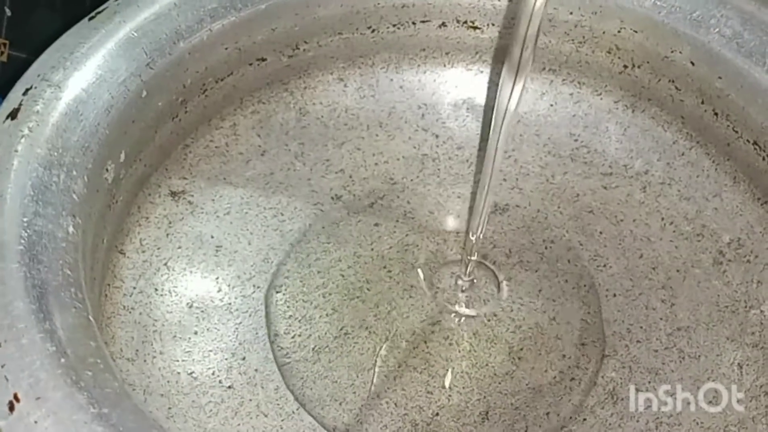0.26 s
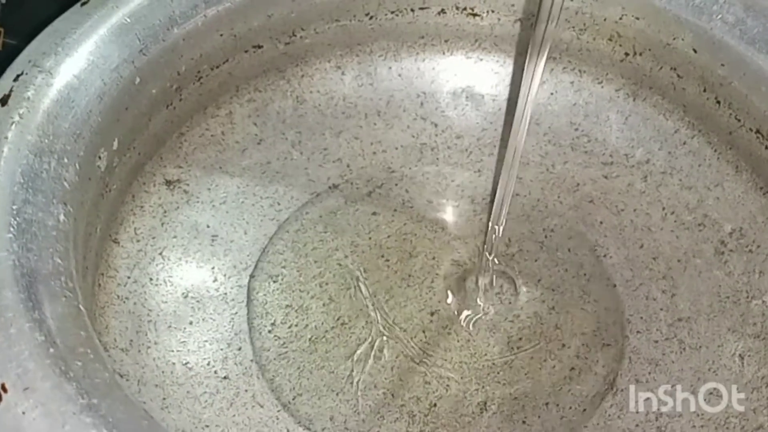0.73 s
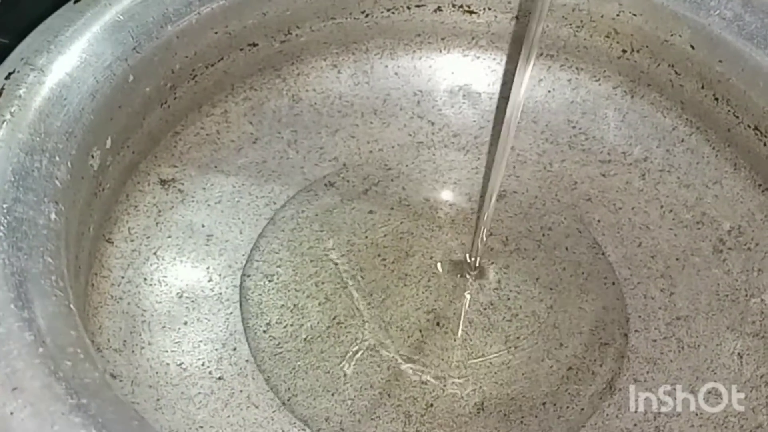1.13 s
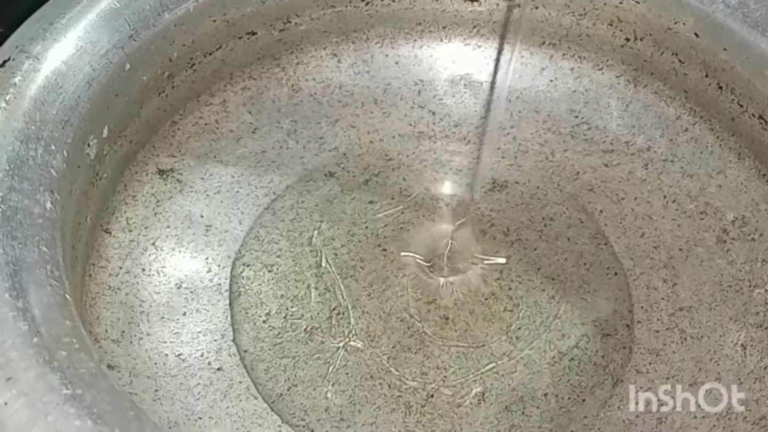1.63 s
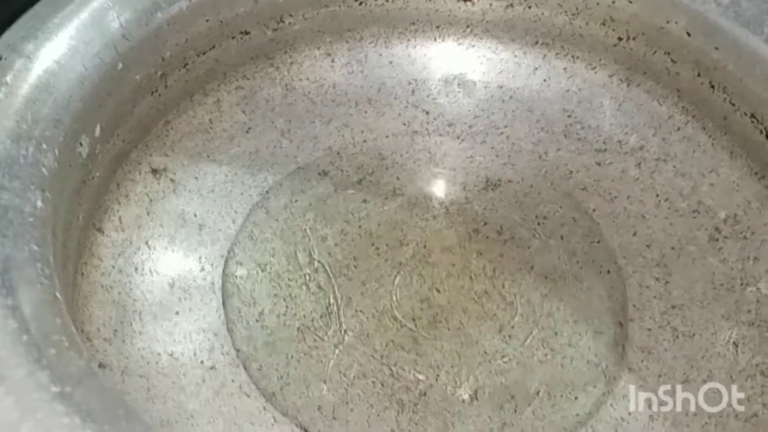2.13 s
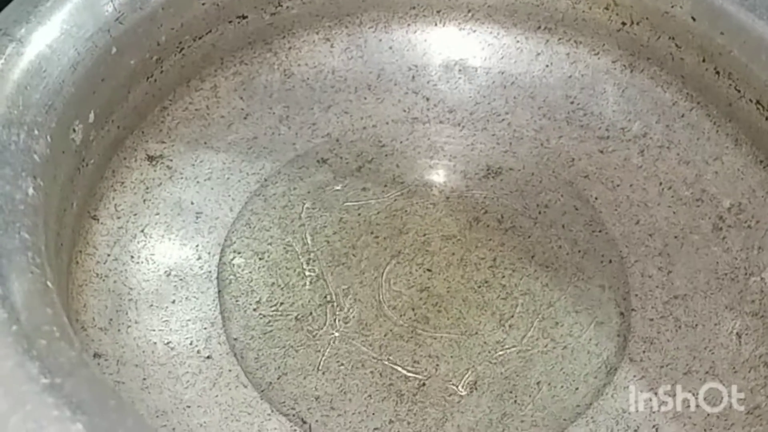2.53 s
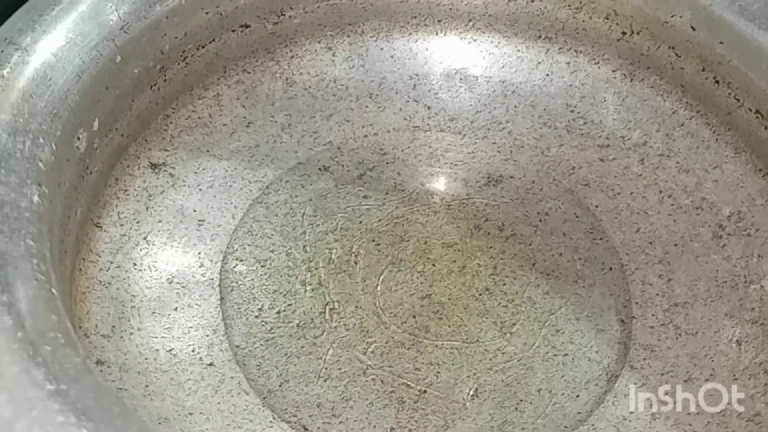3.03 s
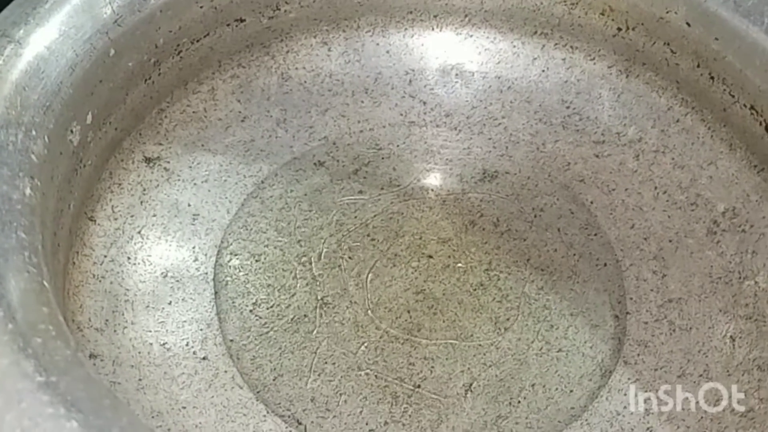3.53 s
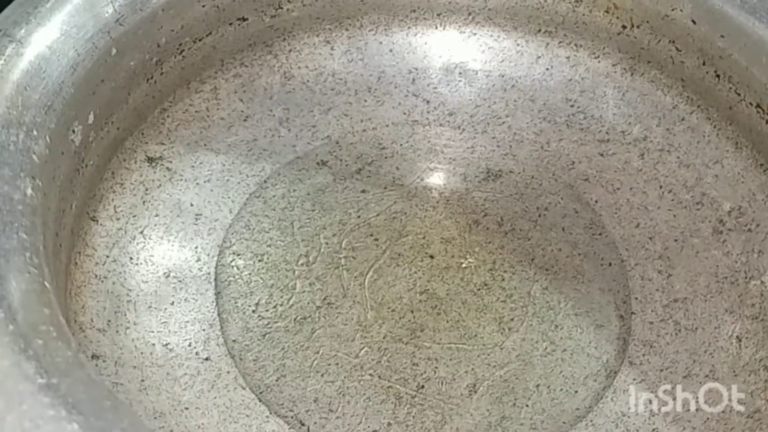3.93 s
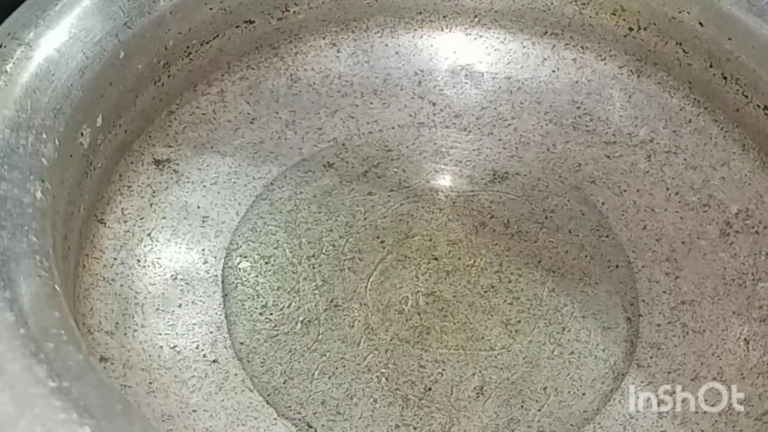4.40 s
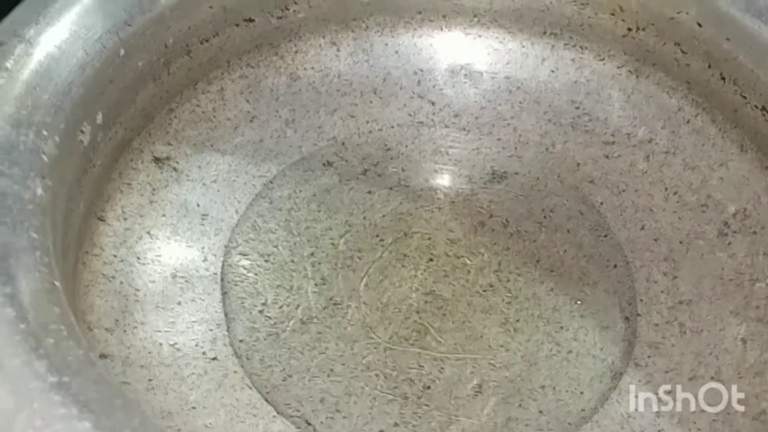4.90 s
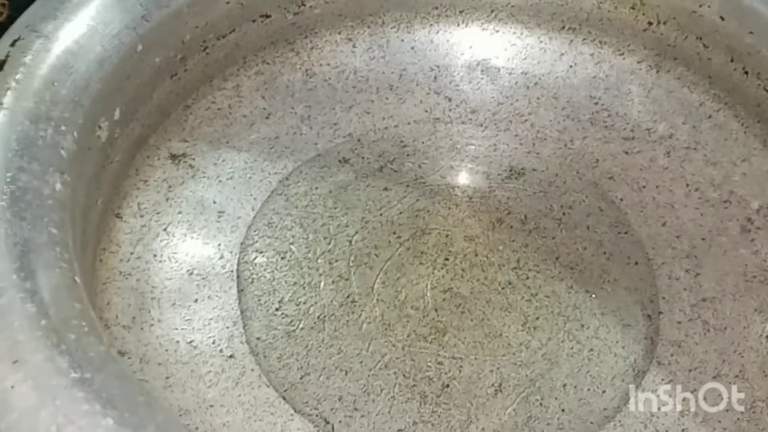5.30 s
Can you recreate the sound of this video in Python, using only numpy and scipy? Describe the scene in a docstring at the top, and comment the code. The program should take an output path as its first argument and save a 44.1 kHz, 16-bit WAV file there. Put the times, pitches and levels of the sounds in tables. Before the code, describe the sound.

A lit gas burner hisses without pause for about five and a half seconds, very close to a phone in a small kitchen. The hiss is bright, grainy and spitting, with a narrow hollow rush near 1.5 kHz under the metal pan and a faint, uneven low flutter around 150 Hz. Dry ticks poke out now and then. At 1.25-1.4 s a steel utensil clinks sharply, followed at 1.5-1.6 s by a rapid dish clatter settling lower, with a faint touch at 1.9 s. From 2.2 to 2.45 s a tumble of woody counter bumps, hollow tocks, gritty scrapes and small metal tinkles is answered by the room; softer bumps follow at 2.7-2.85 s. A faint clink comes near 3.1 s. Shrill, thin metal tinkles at 3.95-4.05 s and 4.3-4.4 s briefly duck the hiss. Soft shuffles and ticks continue underneath, and the hiss ends unfaded.

```python
"""A gas burner hisses, spits and flutters under a metal pan of oil, very close to a phone in a small kitchen:
shaped turbulent noise with a resonant rush under the pan and a low roar.
Struck modes make steel utensils clink and a dish clatter; bumps, tocks, grit and soft shuffles come from
the counter. Dry ticks stand out, and thin metal tinkles beside the microphone, so shrill that the limiter
briefly pulls the hiss down."""
import sys
import numpy as np
from scipy import signal
from scipy.fft import rfft, irfft, next_fast_len
from scipy.io import wavfile
from scipy.ndimage import uniform_filter1d, minimum_filter1d, map_coordinates

SR = 44100
rng = np.random.default_rng(int(sys.argv[2]) if len(sys.argv) > 2 else 0)


def inscribe(sig):
    """Save sig as 16-bit PCM at rate SR to the path in sys.argv[1].

    A 1-D sig is mono; a 2-D sig holds one channel per row.
    Samples are clipped to [-1, 1] before scaling.
    """
    pcm = np.round(np.clip(np.atleast_2d(sig).T, -1, 1) * 32767)
    wavfile.write(sys.argv[1], SR, pcm.astype(np.int16))


N = 244755  # length in samples

# Hiss over time: t/s, treble level/dB, body level/dB, sizzling top relative to the treble/dB
HISS_LEVELS = [(0.0, -31.5, -32.5, 2), (0.8, -33, -31.5, 0), (1.3, -32.5, -31.5, 1),
               (1.82, -31.5, -31, 1.5), (2.1, -35, -34, 2), (2.36, -29.5, -31, -5), (2.5, -35, -32.5, 2.5),
               (2.8, -34, -30.5, 3.5), (2.93, -30, -28, 4.5), (3.0, -32, -34.5, -0.5),
               (3.14, -31.5, -30.5, 3), (3.4, -29.5, -30, -1), (3.48, -34, -33, 1.5), (3.7, -31, -31, 3),
               (4.16, -30.5, -33, -0.5), (4.56, -30.5, -30.5, -4), (4.76, -31.5, -32, -4),
               (5.55, -29, -30.5, -7)]
# Low flutter of the flame: t/s, roar level/dB
ROAR_LEVELS = [(0.0, -58), (0.16, -60), (0.71, -46), (0.83, -67), (0.97, -48.5), (1.17, -74), (1.27, -48.5),
               (1.59, -59.5), (2.1, -51.5), (2.6, -54.5), (3.03, -61), (3.11, -49), (3.4, -59), (3.63, -60),
               (3.71, -54), (3.94, -57.5), (4.2, -47), (4.33, -65), (4.42, -51), (5.27, -47), (5.55, -54.5)]
# Colour of the gas jets: f/Hz, relative level/dB
JET_COLOUR = [(1200, -44), (2000, -17.5), (3000, -4), (4200, -2.5), (5100, -5), (6400, 1.5), (7500, 0),
              (8600, -9.5), (9800, -15.5), (11500, -14.5), (13400, -26), (14300, -17.5), (15200, -13.5),
              (16000, -7)]
# Colour of the rush under the pan: f/Hz, relative level/dB
RUSH_COLOUR = [(40, -17), (120, -8.5), (220, -16), (420, -12.5), (600, -13), (850, -18.5), (1100, -11),
               (1550, -16.5), (2200, 1), (2900, 2), (4000, -4), (7000, -34)]
# Resonances of the air between burner and pan: f/Hz, width/Hz, relative level/dB
HOLLOW_RESONANCES = [(350, 33, -17), (501, 42, -11), (812, 21, -2), (1366, 25, -4), (1461.4, 20.6, 10),
                     (1630, 220, -0.5), (2054, 112, 5)]
# Colour of the low roar: f/Hz, relative level/dB
ROAR_COLOUR = [(25, -93), (55, -28), (90, -13), (125, -15), (147, 3), (170, -11.5), (220, -24), (400, -49)]
JET_SPLIT_HZ = 7600  # where the body of the hiss gives way to its treble
SIZZLE_HZ, SIZZLE_OCTAVES = 8740, 0.14  # band of the sizzling top
RUSH_DB = -8.5  # mean level of the rush, relative to the body of the hiss
HOLLOW_SWING_DB = 3.5  # depth of the random swing of the hollow's resonances


def burner():
    """Turbulent jets hiss and spit, the rush excites the hollow under the pan and the flame flutters low."""
    treble_db, body_db, sizzle_db = curves(HISS_LEVELS)
    roar_db, = curves(ROAR_LEVELS)
    noise = lambda: rng.standard_normal((2, N))
    flicker_db = 0.55 * wobble(18) + 0.55 * wobble(45)
    fine_spits = crackle(rate=520, life=0.00069, scatter_db=1.0)
    coarse_spits = crackle(rate=71, life=0.0041, scatter_db=5)
    spits = 0.51 * fine_spits + 0.3 * coarse_spits

    jet = patchy(noise() + spits, depth_db=1.64, size=20)
    jet = spread(pan_echoes(jet, echo_db=-18))
    jet = unit(filtered(jet, lambda f: amp(along(JET_COLOUR, f))))
    body = filtered(jet, lambda f: 1 / (1 + (f / JET_SPLIT_HZ) ** 8))
    sizzle = filtered(jet, lambda f: bell(f, SIZZLE_HZ, SIZZLE_OCTAVES))
    treble = jet - body + (amp(sizzle_db) - 1) * sizzle

    rush = filtered(spread(noise() + 0.6 * spits), lambda f: amp(along(RUSH_COLOUR, f)))
    hollow = filtered(spread(noise()), lambda f: resonances(HOLLOW_RESONANCES, f))
    rush += amp(HOLLOW_SWING_DB * wobble(14)) * hollow
    # the large, slow eddies burble more unevenly than the small ones
    large_eddies = filtered(rush, lambda f: 1 / (1 + (f / 1200) ** 8))
    small_eddies = rush - large_eddies
    rush = 0.79 * patchy(large_eddies, depth_db=6.0, size=4) + patchy(small_eddies, depth_db=3.0, size=7)
    rush = unit(rush)

    roar = filtered(spread(noise(), lag=0.00079), lambda f: amp(along(ROAR_COLOUR, f)))
    roar = unit(roar)

    gas = amp(treble_db + 1.8 * wobble(14)) * treble
    gas += amp(body_db) * (body + amp(RUSH_DB + 0.74 * wobble(16)) * rush)
    return amp(flicker_db) * gas + amp(roar_db + 0.67 * wobble(16)) * roar


def patchy(pair, depth_db, size):
    """Turbulence: patches, size bins wide and some 80 ms long, swell and sink."""
    z = signal.stft(pair, nperseg=1024)[2]
    field = rng.standard_normal(z.shape[1:])
    field = uniform_filter1d(field, size=size, axis=0)
    field = uniform_filter1d(field, size=7, axis=1)
    return signal.istft(z * amp(depth_db * unit(field)), nperseg=1024)[1][:, :N]


def pan_echoes(x, echo_db, count=10):
    """The pan's wall and the stove top return weak copies within 12 ms, which ripple the spectrum."""
    response = np.zeros((2, int(0.012 * SR)))
    response[:, 0] = 1
    for port in response:
        delays = rng.integers(SR // 1000, len(port), count)
        port[delays] = amp(echo_db) * rng.choice([-1, 1], count)
    return signal.fftconvolve(x, response, axes=1)[:, :N]


# Taps on a steel utensil: t/s, level/dB, pitch f/Hz, width/octaves, scrape/s
UTENSIL_TAPS = [(1.249, -32.5, 3040, 0.49, 0.0092), (1.3178, -19.5, 4130, 0.6, 0.00059),
                (1.329, -28.5, 2680, 0.33, 0.00079), (1.364, -31.5, 2380, 0.15, 0.001),
                (3.128, -38, 2600, 0.63, 0.0082)]
# Modes of the utensil: f/Hz, relative level/dB, t60/s
UTENSIL_MODES = [(2328, -7, 0.3), (2767, 4, 0.09), (2885, -1, 0.17), (2938, 2, 0.12), (3088, -10, 0.22),
                 (3265, -5, 0.1), (3352, 0, 0.1), (3510, -12, 0.17), (3660, -8, 0.12), (3825, -7, 0.06),
                 (3895, -2, 0.06), (4440, -11, 0.16), (4530, -2, 0.08), (4675, -1, 0.07), (5485, -3, 0.05),
                 (6200, -6, 0.07), (7020, -2, 0.05), (7190, 0, 0.05)]
# Clatter of a steel dish, lower as it settles: t/s, level/dB, pitch f/Hz, width/octaves, scrape/s
DISH_BLOWS = [(1.4748, -27.5, 2700, 0.12, 0.002), (1.481, -34, 2550, 0.1, 0.002),
              (1.488, -30.5, 2700, 0.12, 0.002), (1.4935, -32, 2650, 0.12, 0.002),
              (1.506, -37, 2400, 0.2, 0.004), (1.521, -34, 2350, 0.2, 0.004),
              (1.528, -32, 2300, 0.3, 0.004), (1.538, -31.5, 2350, 0.2, 0.004),
              (1.5445, -28.5, 2300, 0.2, 0.002), (1.55, -30.5, 2450, 0.3, 0.002),
              (1.561, -37, 2050, 0.2, 0.003), (1.572, -39, 2350, 0.25, 0.003),
              (1.59, -41, 2400, 0.3, 0.004), (1.879, -37, 2200, 0.25, 0.012)]
# Modes of the dish: f/Hz, relative level/dB, t60/s
DISH_MODES = [(1665, -10, .2), (1890, -6, .2), (2202, -3, .12), (2308, 0, .12), (2388, -5, .08),
              (2495, -2, .04), (2655, -2, .04), (2790, -4, .05), (2855, -4, .05), (2965, -4, .08)]


def utensils():
    """Struck steel modes: a utensil gives bright clinks, and a dish clatters and settles."""
    clinks = steelware(UTENSIL_TAPS, UTENSIL_MODES, crack_db=11, crack_t60=0.016, crack_octaves=0.7,
                       attack=0.0018, wet_db=-12)
    clatter = steelware(DISH_BLOWS, DISH_MODES, crack_db=17, crack_t60=0.028, crack_octaves=0.27,
                        attack=0.0007, wet_db=-7)
    return clinks + clatter


def steelware(blows, modes, crack_db, crack_t60, crack_octaves, attack, wet_db):
    """Steel meets steel; the place of contact picks which modes ring over a broader, grainy crack."""
    out, t = np.zeros((2, N)), np.arange(int(0.4 * SR)) / SR
    for s, db, hz, octaves, scrape in blows:
        # one sharp hit, then a dying scrape
        contact = 0.05 * rng.standard_normal(len(t)) * np.exp(-t / scrape)
        contact[0] += 1
        crack = amp(crack_db) * fade(t, crack_t60) * rng.standard_normal((2, len(t)))
        crack = filtered(crack, lambda f: bell(f, hz, crack_octaves))
        picked = [(f, level + 20 * np.log10(bell(f, hz, octaves) + 1e-6), t60) for f, level, t60 in modes]
        body = ring(picked, t, scatter_db=1) + crack
        clink = signal.fftconvolve(body, contact[None], axes=1)[:, :len(t)]
        add(out, s, room(struck(clink, db, attack), wet_db))
    return out


# Thin metal touching: t/s, level/dB, level of its shrillest mode/dB
TINKLE_TOUCHES = [(.948, -36, -30), (2.249, -37, -30), (2.32, -28, -4.5), (2.345, -32, -30),
                  (2.477, -29, -30), (3.249, -36, -30), (3.388, -33.5, -30), (3.77, -39, -30),
                  (3.802, -32.5, -30), (3.945, -15, 5.5), (3.966, -23, -30), (3.986, -22, -3),
                  (4.018, -23, -30), (4.039, -28, -30), (4.32, -24, 3), (4.338, -29, -30),
                  (4.361, -19.5, 2.5)]
# Modes of the thin metal: f/Hz, relative level/dB, t60/s
THIN_MODES = [(8750, -10, 0.11), (9450, -13, 0.12), (9250, -10, 0.13), (10150, -19, 0.11),
              (13900, -12, 0.06), (14600, -6, 0.08), (14780, 0, 0.09), (14820, -3, 0.14), (15100, -1, .1),
              (15270, -1, .1), (15430, -2, .08)]
CHATTER_S, CHATTER_LOSS_DB = 0.014, 9.5  # time between rebounds; loss at each
SHRILL_HZ, SHRILL_T60_S = 18000, 0.35  # the shrillest mode and its decay


def tinkles():
    """Small thin metal pieces rebound and ring in high modes, the shrillest above the output band."""
    out, shrill_power = np.zeros((2, N)), np.zeros(N)
    t = np.arange(int(0.3 * SR)) / SR
    onset = 1 - np.exp(-t / 0.0013)
    for start, first_db, shrill_db in TINKLE_TOUCHES:
        for s, db in rebounds(start, first_db, CHATTER_S, CHATTER_LOSS_DB, count=3):
            chatter = rng.standard_normal((2, len(t)))
            chatter = filtered(chatter, lambda f: bell(f, 15200, 0.055) + 0.1 * bell(f, 9200, 0.1))
            chatter = unit(chatter) * (4.5 * fade(t, 0.022) + 0.5 * fade(t, 0.12))
            tinkle = (ring(THIN_MODES, t, scatter_db=1.5) + chatter) * onset
            add(out, s, room(struck(tinkle, db), wet_db=-10))
        add(shrill_power, start, (amp(shrill_db) * fade(t, SHRILL_T60_S) * onset) ** 2)
    return out + np.sqrt(shrill_power) * np.sin(2 * np.pi * SHRILL_HZ * np.arange(N) / SR)


def rebounds(s, db, gap, loss_db, count):
    """Time and level of a contact and its ever weaker, evenly spaced repeats."""
    return [(s + k * gap, db - k * loss_db) for k in range(count)]


# Things bump and rock as they are set down: t/s, level/dB, pitch f/Hz, width/octaves, t60 of the contact/s
BUMPS = [(2.195, -34, 600, 2.8, .04), (2.211, -33, 600, 1.8, 0.036), (2.222, -28.5, 600, 1.4, 0.018),
         (2.2301, -24, 846, 1.7, 0.021), (2.2385, -32.5, 1400, 0.76, 0.0074),
         (2.246, -30.5, 800, 1.7, 0.016), (2.254, -29, 700, 0.83, 0.012),
         (2.261, -36.5, 1080, 0.58, 0.0073), (2.27, -31.5, 1200, 1.4, 0.0073), (2.28, -36, 800, 1.7, .01),
         (2.291, -28, 640, 1.7, 0.017), (2.303, -31, 1300, 1.2, 0.0068), (2.326, -29, 300, 0.66, 0.018),
         (2.338, -28, 600, 2, 0.014), (2.351, -37, 420, 0.97, 0.02), (2.378, -38, 900, 0.69, 0.029),
         (2.446, -43, 1000, 0.73, 0.052), (2.708, -28.5, 620, 0.55, 0.018),
         (2.7185, -29.5, 670, 0.7, 0.011), (2.73, -35, 600, 0.54, 0.018), (2.738, -35, 480, 1.5, 0.023),
         (2.768, -45, 600, 0.48, .02), (2.802, -34.5, 700, 0.68, 0.023), (2.85, -43.5, 556, 1, .05)]
# Resonances of the counter: f/Hz, width/Hz, relative level/dB
COUNTER_RESONANCES = [(134, 46, 7.5), (249, 34, 5), (321, 14, 12.5), (414, 25, 1.5), (482, 49, 2),
                      (553, 34, 5), (634, 41, 6.5), (693, 18, 6.5), (789, 61, 2), (1290, 200, -5.5),
                      (1510, 34, 0), (1610, 110, -8), (1896, 110, -2), (1965, 80, 0.5), (3200, 1230, -1)]


def counter():
    """Each bump is a dying noise contact that rings the counter's resonances, and the kitchen answers."""
    out, t = np.zeros((2, N)), np.arange(int(0.25 * SR)) / SR
    for s, db, hz, octaves, t60 in BUMPS:
        contact = rng.standard_normal(len(t)) * fade(t, t60)
        low_cut = lambda f: f ** 4 / (f ** 4 + 90 ** 4)
        blow = filtered(contact, lambda f: resonances(COUNTER_RESONANCES, f) * bell(f, hz, octaves) * low_cut(f))
        add(out, s, room(struck(blow, db), wet_db=4.5))
    return out


# Hollow tocks of a small hard edge touching down: t/s, level/dB, pitch f/Hz, t60/s
EDGE_TOCKS = [(2.2045, -32.5, 1630, .035), (2.2155, -28.5, 1660, .02), (2.232, -36, 1620, .03),
              (2.262, -35, 1900, .02), (2.302, -38, 1800, .025), (2.427, -41, 1970, .08)]


def tocks():
    """One short resonance rings straight ahead of the phone, alike at both ports, and fades into the room."""
    out, t = np.zeros((2, N)), np.arange(int(0.15 * SR)) / SR
    for s, db, hz, t60 in EDGE_TOCKS:
        grain = filtered(rng.standard_normal(len(t)), lambda f: bell(f, hz, octaves=0.27))
        tone = np.sin(2 * np.pi * hz * t) + 0.5 * unit(grain)
        tock = struck(tone * fade(t, t60), db, attack=0.0012)
        add(out, s, tock)
        add(out, s, amp(-4.0) * room(tock, wet_db=26))
    return out


# Grit crunching under sliding things: t/s, length/s, level/dB, pitch f/Hz
GRIT_SLIDES = [(2.235, 0.047, -34.5, 4040), (2.33, 0.041, -40, 5960), (2.418, 0.037, -34.5, 3000),
               (2.707, 0.027, -44, 5400)]


def scrapes():
    """Separate grains of grit crack at uneven moments while something slides."""
    out = np.zeros((2, N))
    for s, length, db, hz in GRIT_SLIDES:
        grit = crackle(rate=380, life=0.0009, scatter_db=2.5)[:, :int(length * SR)]
        grit = filtered(grit, lambda f: bell(f, hz, octaves=0.9))
        add(out, s, room(amp(db) * unit(grit), wet_db=-19))
    return out


# Dry ticks and snaps: t/s, level/dB, pitch f/Hz, width/octaves, t60/s
DRY_TICKS = [(0.352, -42, 9500, .4, .04), (0.949, -34, 7000, 0.5, 0.055), (1.083, -33, 6700, 0.35, 0.05),
             (1.52, -38, 8800, 0.25, 0.085), (2.215, -30, 6400, 0.3, 0.014), (2.3205, -24, 7000, .7, .06),
             (2.708, -34, 6500, .25, .04), (3.285, -32, 7300, 0.11, 0.15), (4.232, -31, 6800, 0.17, 0.15),
             (4.3595, -14, 15200, .04, .025), (4.418, -32, 6400, 0.1, 0.028),
             (4.675, -33, 6400, 0.14, 0.059), (5.441, -32, 6260, 0.13, 0.042)]


def ticks():
    """Single dry ticks, decaying bands of noise, stand out of the hiss; others come at random moments."""
    out, t = np.zeros((2, N)), np.arange(int(0.12 * SR)) / SR
    # same columns as the table
    at_random = [(s, -32, 6750, 0.11, 0.018) for s in rng.random(size=8) * N / SR]
    for s, db, hz, octaves, t60 in DRY_TICKS + at_random:
        burst = rng.standard_normal((2, len(t))) * fade(t, t60)
        snap = filtered(burst, lambda f: bell(f, hz, octaves))
        add(out, s, room(struck(snap, db, attack=0.0016), wet_db=-9))
    return out


# Faint shuffling at the counter: t/s, level/dB, pitch f/Hz, width/Hz, length/s
NUDGES = [(0.297, -61.5, 413, 120, 0.13), (0.936, -38, 2080, 900, 0.017), (1.168, -54.5, 390, 159, 0.24),
          (2.046, -44, 1150, 450, 0.018), (3.16, -47.5, 950, 400, .02), (3.425, -48, 920, 700, 0.03),
          (4.067, -52, 584, 40, 0.082), (4.924, -40.5, 1270, 1110, 0.022), (5.067, -55.5, 850, 503, 0.092),
          (5.45, -51, 780, 500, 0.052)]


def shuffles():
    """Things are nudged on the counter: soft swells of noise around one resonance."""
    out, t = np.zeros((2, N)), np.arange(-SR // 4, SR // 4) / SR
    for s, db, hz, width, length in NUDGES:
        rub = rng.standard_normal((2, len(t)))
        rub = filtered(rub, lambda f: resonances([(hz, width, 0)], f) ** 2)
        add(out, s + t[0], amp(db) * unit(spread(rub)) * np.exp(-(t / length) ** 2))
    return out


# Decay of the kitchen: f/Hz, t60/s
KITCHEN_DECAY = [(150, 0.56), (700, 0.38), (2500, 0.42), (8000, 0.71), (15000, 0.31)]
# Likeness of the room sound at the two ports: f/Hz, likeness (0 to 1)
ROOM_LIKENESS = [(100, 0.96), (600, 0.88), (1200, 0.18), (3000, 0.14)]


def room(x, wet_db):
    """A sound and a fresh diffuse kitchen tail at both ports."""
    hz, t, z = signal.stft(rng.standard_normal((2, int(0.8 * SR))), SR, nperseg=256)
    tail = signal.istft(z * fade(t, along(KITCHEN_DECAY, hz)[:, None]), SR, nperseg=256)[1]
    tail *= amp(wet_db) / np.linalg.norm(tail[0])
    tail[0, 24] += np.sqrt(2)  # the direct path
    response = spread(tail, ROOM_LIKENESS, lag=0.001015)
    return signal.fftconvolve(np.atleast_2d(x), response, axes=1) / np.hypot(1, amp(wet_db))


# Likeness of close sound at the two ports: f/Hz, likeness (0 to 1)
CLOSE_LIKENESS = [(50, 0.3), (150, 1), (300, 0.67), (550, 0.78), (1000, 0.23), (2500, 0.082), (8000, 0.017)]


def spread(pair, alike=CLOSE_LIKENESS, lag=0.000888):
    """Two unrelated signals become a pair, alike as the curve says, that reaches the left port later by lag."""
    turn = lambda f: np.arccos(np.clip(along(alike, f), -1, 1)) / 2
    mid, side = filtered(pair, lambda f: np.array([np.cos(turn(f)), np.sin(turn(f))]))
    ports = np.array([mid + side, mid - side])
    return filtered(ports, lambda f: np.exp(1j * np.pi * f * lag * np.array([[-1], [1]])))


def crackle(rate, life, scatter_db):
    """Tiny noise spits of scattered size that start at once and die away, of rms 1."""
    sizes = amp(scatter_db * np.clip(rng.standard_normal(N), -2, 2))
    spits = (rng.random(N) < rate / SR) * sizes
    power = signal.lfilter([1], [1, -np.exp(-1 / (life * SR))], spits ** 2)
    return unit(np.sqrt(power) * rng.standard_normal((2, N)))


def ring(modes, t, scatter_db):
    """Decaying modes, at new strengths and phases for each blow and port."""
    hz, db, t60 = np.transpose(modes)[:, :, None]
    size = amp(db + scatter_db * rng.standard_normal((2, len(modes), 1)))
    phase = 2 * np.pi * rng.random((2, len(modes), 1))
    return np.sum(size * fade(t, t60) * np.sin(2 * np.pi * hz * t + phase), axis=1)


def struck(x, db, attack=0.00025):
    """A blow swells over its attack and has the level db in its first 20 ms."""
    x = x * (1 - np.exp(-np.arange(x.shape[-1]) / SR / attack))
    return amp(db) * x / np.sqrt(np.mean(x[..., :SR // 50] ** 2))


def resonances(modes, f):
    """Causal response of resonances given as centre (Hz), width (Hz) and level (dB), in alternating sign."""
    return sum((-1) ** k * amp(db) * 1j * f * w / (c * c - f * f + 1j * f * w)
               for k, (c, w, db) in enumerate(modes))


def bell(f, hz, octaves):
    """A smooth band around hz."""
    return np.exp(-0.5 * (np.log2((f + 1) / hz) / octaves) ** 2)


def filtered(x, response):
    """Sound x passed through a complex response of frequency."""
    n = x.shape[-1]
    m = next_fast_len(n + SR // 4)
    return irfft(rfft(x, m) * response(np.fft.rfftfreq(m, 1 / SR)), m)[..., :n]


def fade(t, t60):
    """Exponential decay by 60 dB in t60."""
    return np.exp(-np.log(1000) * t / t60)


def wobble(rate):
    """A smooth random curve, rate knots a second."""
    knots = rng.standard_normal(int(N * rate / SR) + 4)
    return map_coordinates(knots, [np.arange(N) * rate / SR])


def curves(rows):
    """One value per sample for each column after the time."""
    s, *cols = np.transpose(rows)
    return [np.interp(np.arange(N) / SR, s, c) for c in cols]


def along(points, hz):
    """Read a curve of frequency points on a log axis."""
    f, v = np.transpose(points)
    return np.interp(np.log(hz + 1), np.log(f + 1), v)


def amp(db):
    """Decibels to linear gain."""
    return 10 ** (np.asarray(db) / 20)


def unit(x):
    """Scale to rms 1."""
    return x / np.sqrt(np.mean(x ** 2) + 1e-20)


def add(track, s, sound):
    """Mix a sound into a track at time s."""
    part = track[..., round(s * SR):][..., :sound.shape[-1]]
    part += sound[..., :part.shape[-1]]


def scene():
    """The burner with all the kitchen handling around it."""
    handling = utensils() + tinkles() + counter() + tocks() + scrapes() + ticks() + shuffles()
    return burner() + handling


def limiter(x, ceiling_db, hold, ease):
    """Both channels are turned down together just ahead of any peak above the ceiling."""
    need = np.minimum(1, amp(ceiling_db) / (np.abs(x).max(axis=0) + 1e-9))
    held = minimum_filter1d(need, int(hold * SR) + 1)
    return x * uniform_filter1d(held, int(ease * SR) + 1)


# Colour of the left port against the right: f/Hz, level difference/dB
PORT_DIFFERENCE = [(60, 1), (150, 2.5), (500, 3), (800, 1), (1150, 4.5), (1800, 9), (2700, 5), (4200, 9.5),
                   (5600, 7.5), (6500, 18), (7900, 21.5), (10200, -1), (13000, -3.5), (15000, 10)]
TOP_HZ = 15900  # band limit of the output


def record(dry):
    """The two ports differ in colour; the limiter hears the full band, the output stops at the band limit."""
    ratio = lambda f: amp(along(PORT_DIFFERENCE, f))
    # the two squared gains always sum to 2
    balance = lambda f: np.array([ratio(f), np.ones_like(f)]) * np.sqrt(2 / (1 + ratio(f) ** 2))
    heard = filtered(dry, balance)
    limited = limiter(heard, ceiling_db=-2.0, hold=0.014, ease=0.016)
    return filtered(limited, lambda f: f < TOP_HZ)


dry = scene()
out = record(dry)
inscribe(out)
```